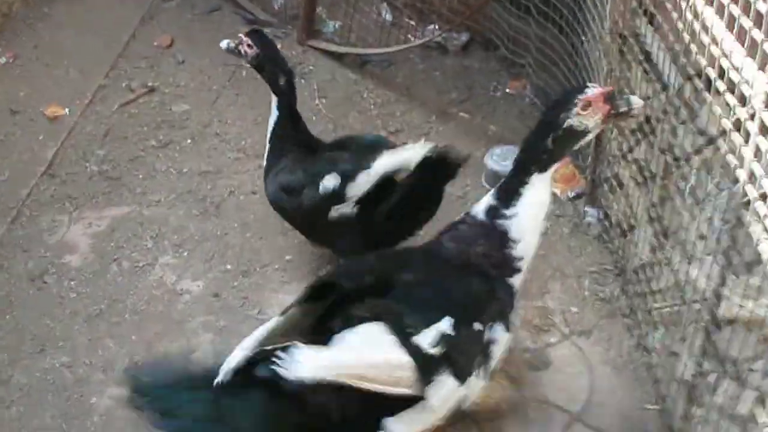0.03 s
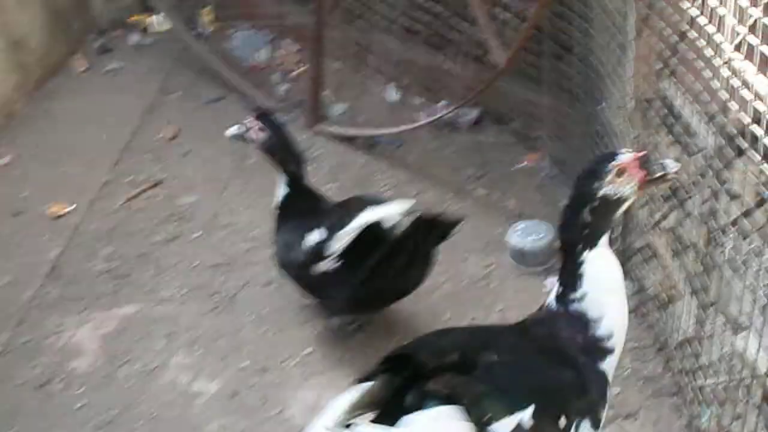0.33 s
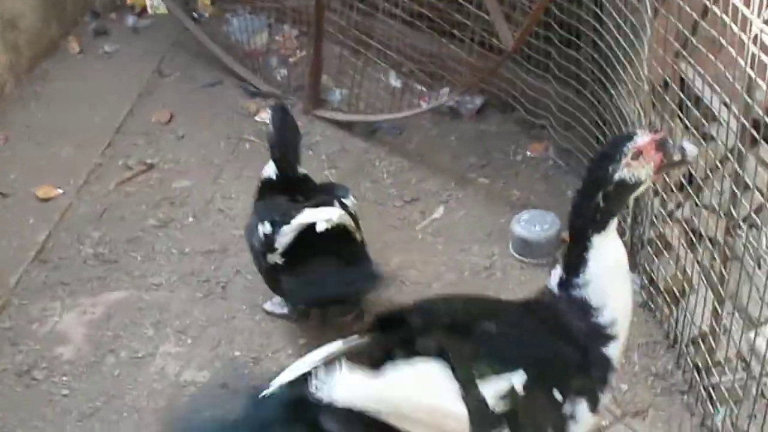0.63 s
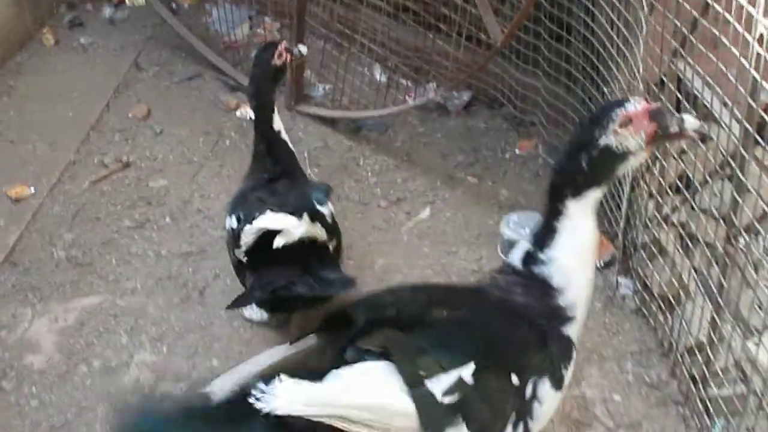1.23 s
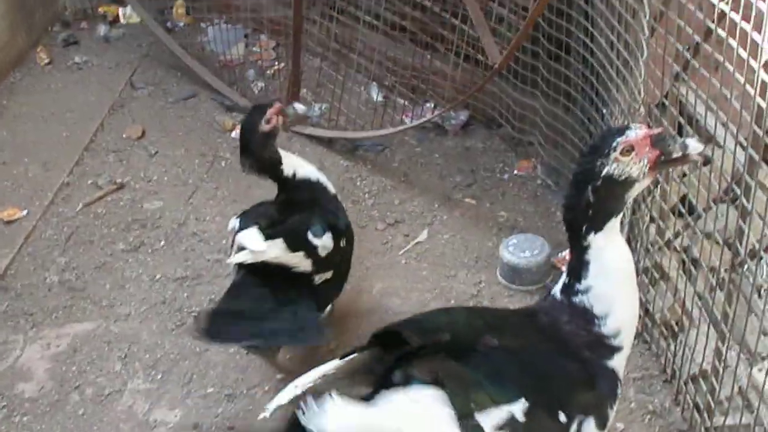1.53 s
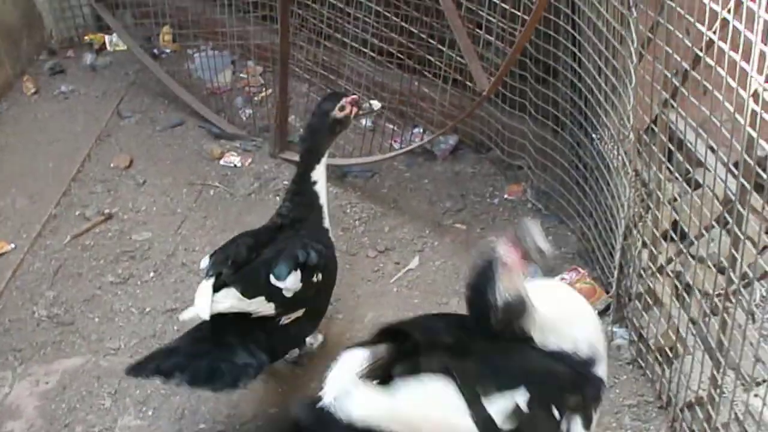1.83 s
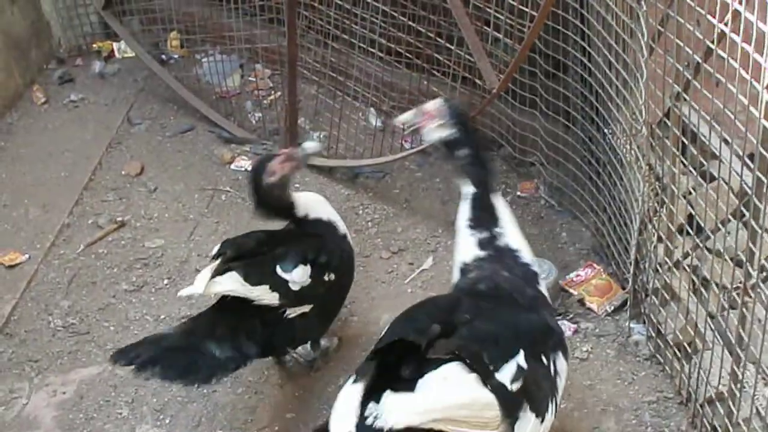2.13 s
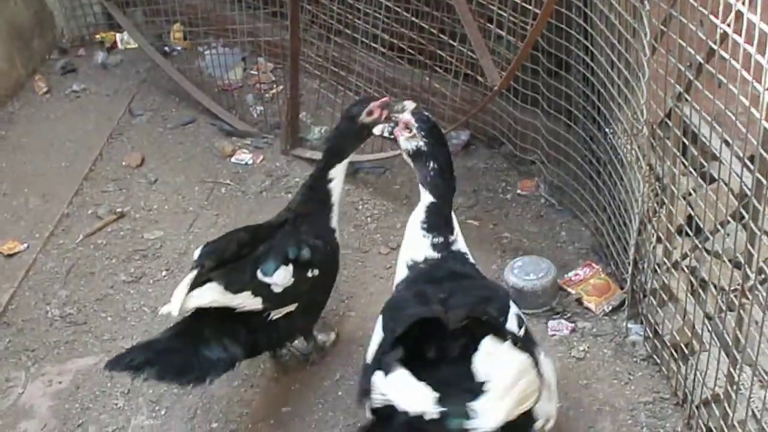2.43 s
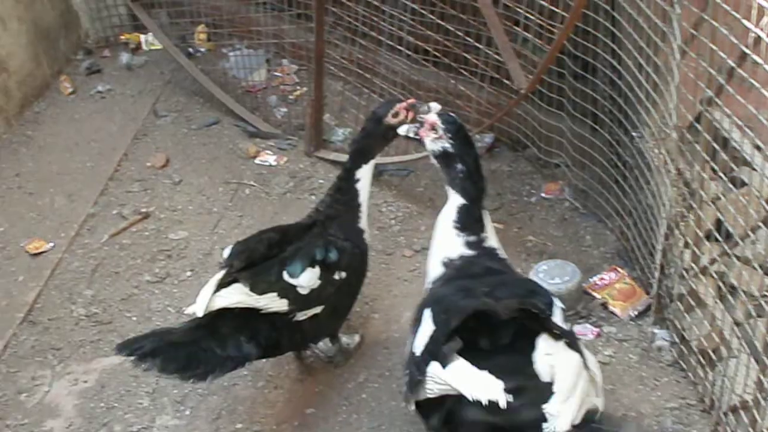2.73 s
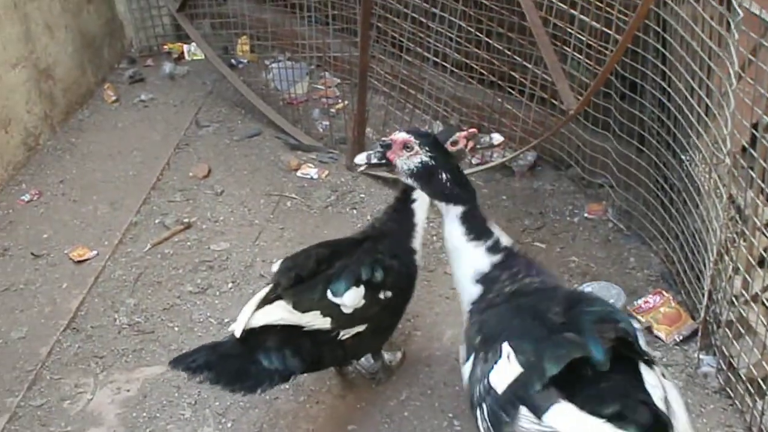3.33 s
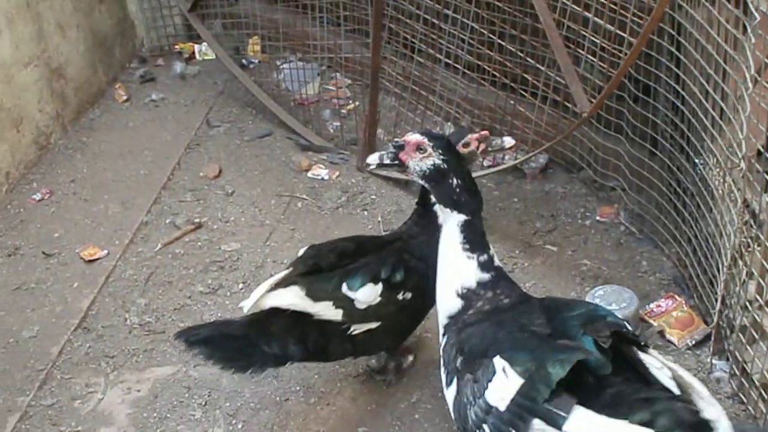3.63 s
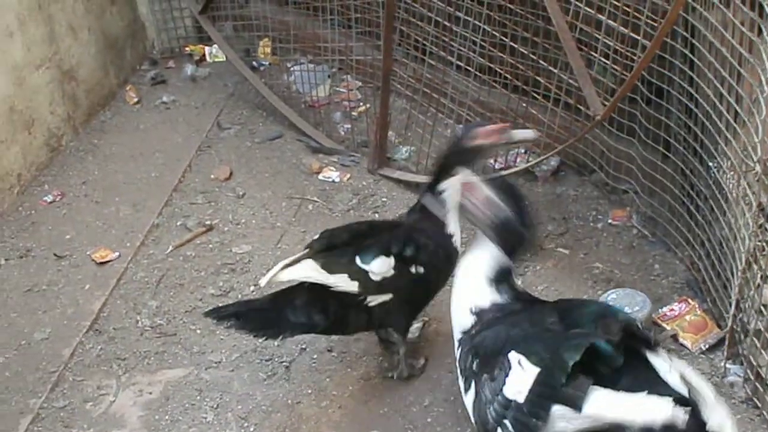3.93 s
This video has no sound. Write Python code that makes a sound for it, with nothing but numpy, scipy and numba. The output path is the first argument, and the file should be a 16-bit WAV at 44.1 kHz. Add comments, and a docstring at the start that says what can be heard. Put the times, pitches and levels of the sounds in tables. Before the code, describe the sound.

Ducks hissing in short puffs, with fluttering whistles and small squeaks, in an outdoor pen.

```python
"""Two ducks greet each other in a wire pen, a metre or two away. One pushes air through throat
and bill in swelling, breathy hisses; the other answers with fluttering whistled trills that
break into falling squeaks. Feet scuff and tick on the dirt. Behind them lie outdoor rumble,
a throbbing insect-like sizzle and a thin electrical whine."""
import sys
import numpy as np
from scipy import signal
from scipy.fft import rfft, irfft
from scipy.io import wavfile
from scipy.ndimage import map_coordinates
from numba import njit

SR = 44100
rng = np.random.default_rng(int(sys.argv[2]) if len(sys.argv) > 2 else 0)


def to_wav(s):
    """Save 16-bit WAV."""
    ch = np.atleast_2d(s).T  # columns
    pcm = np.round(np.clip(ch, -1, 1) * 32767)  # PCM
    wavfile.write(sys.argv[1], SR, pcm.astype(np.int16))


N = 176400


def undb(db):
    """Decibels to gain."""
    return 10 ** (np.asarray(db) / 20)


def unit(x):
    """Scale to rms 1."""
    return x / np.sqrt(np.mean(x ** 2))


def walk(rate_hz, n):
    """Smooth random wander, spread about 1."""
    at = np.arange(n) / SR * rate_hz
    return 1.1 * map_coordinates(rng.standard_normal(8192), [at + rng.uniform(0, 1)], order=3, mode="wrap")


def coloured(points):
    """Noise of rms 1, shaped by (Hz, dB) points."""
    hz, db = np.array(points).T
    bins_hz = np.maximum(np.arange(N // 2 + 1) * SR / N, 1)
    gain = undb(np.interp(np.log(bins_hz), np.log(hz), db))
    return unit(irfft(rfft(rng.standard_normal(N)) * gain, N))


@njit
def bandpass(x, hz, width_hz):
    """State-variable band-pass with a moving centre."""
    y, band_state, low_state = np.empty(len(x)), 0., 0.
    for i in range(len(x)):
        g = np.tan(np.pi * min(hz[i], .45 * SR) / SR)
        damping = width_hz / hz[i]
        band = (band_state + g * (x[i] - low_state)) / (1 + g * (g + damping))
        band_state = 2 * band - band_state
        low_state += 2 * g * band
        y[i] = damping * band
    return y


def resonance(hz, width_hz):
    """Turbulent air in one steep-sided resonance."""
    once = bandpass(rng.standard_normal(len(hz)), hz, float(width_hz))
    return bandpass(once, hz, float(width_hz))


def gate(t, start_s, end_s, edge_s):
    """Smooth on and off, each edge centred on its time."""
    ramp = np.clip(np.minimum(t - start_s, end_s - t) / edge_s + .5, 0, 1)
    return np.sin(np.pi / 2 * ramp) ** 2


def add(out, start_s, x):
    """Mix x in at start_s."""
    i = max(int(start_s * SR), 0)
    out[i:i + len(x)] += x[:max(N - i, 0)]


def rumble(t):
    """Low outdoor noise that wavers and dips once."""
    # Each row: frequency in Hz, level in dB.
    spectrum = [(25, -5.5), (60, -1), (130, 0), (250, 0.5), (420, -1.5), (700, 2), (950, -1), (1500, -11),
                (2200, -13), (3800, -8.5), (5500, -15), (9000, -18.5), (12000, -23), (16000, -19.5)]
    lull_s, lull_half_width_s, lull_db = 2.53, .21, -2.5
    dip_db = lull_db * np.exp(-((t - lull_s) / lull_half_width_s) ** 2)
    return coloured(spectrum) * undb(-40.5 + dip_db + .97 * walk(9.7, N))


def sizzle(t):
    """High insect-like noise that throbs and pauses."""
    # Each row: frequency in Hz, level in dB.
    spectrum = [(1000, -20), (2500, -13), (4000, -7), (5300, -8), (6500, 1), (7400, -0.5), (9000, -7),
                (11000, -15.5), (16000, -31)]
    # Each row: time in seconds, level in dB.
    envelope = [(0, -36), (.3, -36.5), (.7, -37.5), (.9, -38), (1.2, -35.5), (1.4, -37), (1.55, -35.5),
                (1.84, -34), (2.09, -37.5), (2.25, -45.5), (2.45, -56), (2.88, -58), (3.02, -37.5),
                (3.35, -40.5), (3.65, -38), (4.0, -41.5)]
    throb_hz, crest_s = 7.07, .691
    throb_db = 2 * np.cos(2 * np.pi * throb_hz * (t - crest_s))
    level_db = np.interp(t, *np.array(envelope).T)
    return coloured(spectrum) * undb(level_db + throb_db + 1.25 * walk(22.5, N))


def whine(t, hz=14947, rms_db=-55):
    """Thin, steady electrical tone."""
    return np.sqrt(2) * undb(rms_db) * np.sin(2 * np.pi * hz * t)


def feet(t):
    """Feet tick and scuff on grit: fast-decaying noise bursts."""
    # Each row: start in seconds, level in dB, decay in seconds.
    ticks = [(0.041, -23.5, 0.01), (.073, -18.5, 0.0011), (.182, -20.5, 0.0034), (.191, -16, 0.0024),
             (.299, -24, 0.0013), (1.53, -30, 0.0055), (1.754, -22.5, 0.0081), (1.79, -25, 0.0038)]
    # Each row: frequency in Hz, level in dB.
    grit_spectrum = [(60, -16), (150, 5), (400, 2.5), (900, 7), (1800, -8.5), (3200, 2.5), (5000, -7),
                     (15000, -27)]
    envelope = sum(undb(db) * (t >= start_s) * np.exp(-np.abs(t - start_s) / decay_s)
                   for start_s, db, decay_s in ticks)
    return coloured(grit_spectrum) * envelope


def squeaks():
    """Short, mostly lower notes of the whistle that settle in pitch and grow raspy."""
    # Each row: start and length in seconds, first and last pitch in Hz, relative level in dB,
    # overtone level in dB, roughness from 0 to 1.
    notes = [(0.055, .04, 955, 1023, -31.5, -25, 0.54), (.13, 0.027, 996, 962, -26, -28, 0.14),
             (0.965, 0.0096, 1005, 895, -21.5, -18, 0.2), (0.992, 0.013, 802, 787, -21.5, -11, 0.3),
             (1.159, 0.02, 758, 630, -21.5, -34, 0.42), (1.178, 0.029, 660, 628, -16, -14, 0.02),
             (1.217, 0.031, 900, 926, -28.5, -17, 0.3), (1.702, 0.014, 962, 900, -22, -25, 0.3),
             (1.743, .014, 995, 942, -30, 2.5, 0.3), (2.125, 0.058, 865, 870, -35, -25, 0.03),
             (2.307, .014, 929, 892, -17, -11, 0.1), (2.349, 0.035, 688, 623, -19.5, -15, 0.19),
             (2.66, 0.12, 736, 812, -29.5, -13, 0.56), (2.769, 0.053, 866, 895, -21, -31, 0.31),
             (2.89, 0.015, 938, 1000, -18, -27, 0.04), (2.906, 0.0227, 1012, 810, -17.5, -10, 0.03),
             (2.922, 0.0333, 753, 682.5, -16, -5, 0.4), (3.103, 0.054, 768, 778, -30, -10, .35),
             (3.411, 0.0075, 993, 837, -15, -16, 0.2), (3.472, .023, 1427, 1450, -18, -18, 0.08),
             (3.548, 0.01, 992, 770, -13, -12, 0.2), (3.555, 0.0316, 700, 713, -16, -8.5, .3)]
    edge_s, rasp_hz, overtone_step_db = .00604, 502, -6
    out, n = np.zeros(N), SR // 10
    t = np.arange(n) / SR - edge_s / 2
    for start_s, length_s, first_hz, last_hz, db, overtone_db, roughness in notes:
        progress = np.clip(t / length_s, 0, 1)
        rasp = roughness * (.5 + progress)
        glide_hz = last_hz + (first_hz - last_hz) * (1 - progress) ** 1.84
        pitch_hz = glide_hz * (1 + .12 * rasp * walk(rasp_hz, n))
        phase = 2 * np.pi * np.cumsum(pitch_hz) / SR
        overtones = sum(undb(overtone_step_db * k) * np.sin((k + 2) * phase + rng.uniform(0, 2 * np.pi))
                        for k in range(5))
        tone = np.sin(phase) + undb(overtone_db) * overtones
        tone *= 1 + .6 * rasp * walk(rasp_hz, n)
        add(out, start_s - edge_s / 2, np.sqrt(2) * undb(db) * tone * gate(t, 0, length_s, edge_s))
    return out


def cavity(modes, tuning, wander_db=2):
    """Air excites a cavity's resonances; each wanders in level."""
    return sum(undb(db + wander_db * walk(31.1, len(tuning))) * resonance(hz * tuning, width_hz)
               for hz, width_hz, db in modes)


def jet_whistles(air):
    """The air jet gains narrow, rising whistles, each swelling and fading on its own."""
    count, low_hz, high_hz = 22, 2297.5, 13470
    relative_width, rise_per_s, wander_db = .014, .35, 4.5
    t = np.arange(len(air)) / SR
    rise = 1 + rise_per_s * t
    places = (np.arange(count) + rng.random(count)) / count
    peaks = sum(undb(wander_db * walk(26.5, len(t))) * bandpass(air, hz * rise, hz * relative_width)
                for hz in low_hz * (high_hz / low_hz) ** places)
    return unit(air + .97 * peaks)


def hisses():
    """Air swells through throat and bill, holds and is cut off; flow flutters, resonances drift."""
    # Each row: start, full strength and end in seconds, first and full relative level in dB,
    # throat resonance in Hz, throat, windpipe and treble gain in dB, tuning factor.
    breaths = [(0.059, 0.118, 0.14, -36.5, -25.5, 960, -10, -10, -0.5, 1.0),
               (.30, 0.385, .42, -38, -26.5, 960, -6, -9, 0, 1),
               (0.481, 0.56, 0.58, -32, -30, 910, -9, 0.5, 2.5, 0.95),
               (.735, .78, .86, -41, -41, 940, -0.5, -1, -14, 0.9),
               (1.027, 1.068, 1.17, -33.5, -20, 950, -2, -4, -4.5, 0.96),
               (1.323, 1.385, 1.41, -52, -42, 1023, 10.5, 0, 9, 1.03),
               (1.69, 1.75, 1.78, -34.5, -36.5, 870, 8, 4, 2, 0.74),
               (2.288, 2.314, 2.346, -32, -23, 910, 3.5, -4.5, 0.5, .97),
               (2.358, 2.373, 2.397, -34, -21.5, 910, 1.5, -2.5, 3, 0.93),
               (2.68, 2.836, 2.885, -38, -26, 930, -2.5, -0.5, 2.5, 0.99),
               (3.074, 3.185, 3.205, -36.5, -25.5, 780, -8.5, 0.5, 0, 1.006),
               (3.197, 3.224, 3.236, -20, -18, 830, -14, 2.5, -0.5, .99),
               (3.411, 3.466, 3.57, -39, -29.5, 950, 1, 8.5, 11, 0.98),
               (3.55, 3.594, 3.62, -28, -22.5, 870, -3.5, -1.5, 2, 1.04),
               (3.774, 3.837, 3.925, -35.5, -30.5, 930, 1.5, 5.5, 5, 0.99),
               (3.929, 3.945, 4, -27.5, -23.5, 1050, -8, 1, -1, 1.0)]
    # Resonances of windpipe, open bill and bill edges. Each row: centre in Hz, width in Hz, gain in dB.
    windpipe_modes = [(1422, 280, 0), (2025, 350, -0.5), (2518, 420, -1.5), (2872, 370, 0.5)]
    bill_modes = [(3460, 510, -0.5), (3920, 390, 4), (4350, 510, 0)]
    edge_modes = [(5120, 780, -6.5), (6140, 1340, -9.5), (7770, 3800, -18.5), (9360, 2300, -12),
                  (12000, 3400, -20), (14500, 3400, -23)]
    attack_s, release_s, flutter_hz, flutter_db = .012, .016, 112, 1.43
    out, n = np.zeros(N), SR // 3
    t = np.arange(n) / SR
    for start_s, full_s, end_s, first_db, full_db, throat_hz, throat_db, pipe_db, edge_db, tuning in breaths:
        drift = 1 + .017 * walk(24.2, n)
        windpipe = undb(pipe_db) * cavity(windpipe_modes, tuning * drift)
        bill = cavity(bill_modes, tuning * drift)
        edges = undb(edge_db) * cavity(edge_modes, tuning * drift)
        jet = jet_whistles(windpipe + bill + edges)
        throat = undb(throat_db) * unit(resonance(throat_hz * drift, width_hz=485))
        swell_db = np.interp(t + start_s, [start_s, full_s], [first_db, full_db])
        effort = undb(swell_db + flutter_db * walk(flutter_hz, n))
        valve = np.minimum(t / attack_s, 1) * np.exp(-np.maximum(t + start_s - end_s, 0) / release_s)
        add(out, start_s, effort * valve * (jet + throat))
    return out


def trills(t):
    """A wheezy whistle warbles unevenly about a slow contour, wider the harder it is blown."""
    # One curve per trill. Each row: time in seconds, centre pitch in Hz, relative level in dB.
    curves = [
        [(.73, 995, -40.5), (.82, 1242, -32.5), (.89, 1395, -36), (.95, 1130, -30), (1.0, 950, -26),
         (1.06, 950, -25.5), (1.16, 1005, -31)],
        [(1.48, 845, -40), (1.52, 980, -31.5), (1.61, 980, -32), (1.65, 1150, -37), (1.70, 934, -27),
         (1.76, 957, -24)],
        [(1.895, 1157, -42.5), (1.94, 1497, -26.5), (1.99, 1369, -26.5), (2.04, 1251, -27), (2.09, 1444, -32),
         (2.19, 1427, -23), (2.25, 1345, -22), (2.31, 1177, -23.5), (2.40, 1162, -24.5)],
        [(2.57, 1330, -37), (2.605, 1457, -29), (2.63, 1396, -32.5), (2.68, 1457, -27.5), (2.76, 1451, -30),
         (2.83, 1423, -27.5), (2.89, 1300, -28.5)],
        [(3.22, 1403, -30.5), (3.29, 1442, -29), (3.34, 1475, -26.5), (3.40, 1558, -24.5), (3.46, 1500, -27),
         (3.50, 1280, -31.5), (3.55, 1192, -27)],
        [(3.70, 1092, -40), (3.78, 1201, -33.5), (3.84, 1250, -29.5), (3.90, 1422, -30.5), (3.96, 1556, -31),
         (4.0, 1630, -24.5)],
    ]
    warble_hz, warble_depth, depth_reference_db = 46.06, .1298, -25
    overtone_db, throb_db, breath_db = -20, 2, -8.5
    out = np.zeros(N)
    for curve in curves:
        times_s, hz, db = np.array(curve).T
        centre_hz = np.interp(t, times_s, hz)
        level_db = np.interp(t, times_s, db)
        rate_hz = warble_hz * (1 + .4 * walk(40, N))
        swing = np.sin(2 * np.pi * np.cumsum(rate_hz) / SR)
        depth = warble_depth * undb(.501 * (level_db - depth_reference_db))
        jitter = .06 * walk(220, N)
        phase = 2 * np.pi * np.cumsum(centre_hz * (1 + depth * swing + jitter)) / SR
        tone = np.sin(phase) + undb(overtone_db) * np.sin(2 * phase)
        tone = unit(tone * undb(throb_db * walk(130, N)))
        breath = undb(breath_db) * unit(resonance(centre_hz, width_hz=410))
        out += unit(tone + breath) * undb(level_db) * gate(t, times_s[0], times_s[-1], edge_s=.012)
    return out


def pen(x):
    """Close reflections from ground and walls, and a short, weak tail."""
    # Each row: delay in seconds, gain in dB.
    echoes = [(.0043, -12.5), (.0108, -9.5), (.0185, -13)]
    t60_s, tail_db, build_s = .32, -11.5, .01
    t = np.arange(SR // 2) / SR
    tail = rng.standard_normal(len(t)) * undb(-60 * t / t60_s) * np.minimum(t / build_s, 1)
    response = undb(tail_db) * tail / np.sqrt(np.sum(tail ** 2))
    for delay_s, db in echoes:
        response[int(delay_s * SR)] += undb(db)
    return x + signal.fftconvolve(x, response)[:N]


def scene():
    """Both ducks and their feet in the pen, over the background; mono."""
    t = np.arange(N) / SR
    low_cut_hz, voice_db = 483, -1.9  # small throats radiate no bass
    low_cut = signal.butter(4, low_cut_hz, "high", fs=SR, output="sos")
    voices = undb(voice_db) * signal.sosfilt(low_cut, hisses() + trills(t) + squeaks())
    return (pen(voices + feet(t)) + rumble(t) + sizzle(t) + whine(t))[None]


def record(dry, top_hz=15750):
    """Steep low-pass."""
    return signal.sosfilt(signal.ellip(10, .2, 80, top_hz, fs=SR, output="sos"), dry)


dry = scene()
out = record(dry)
to_wav(out)
```